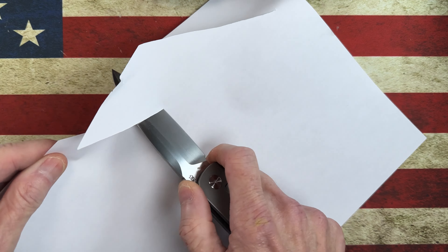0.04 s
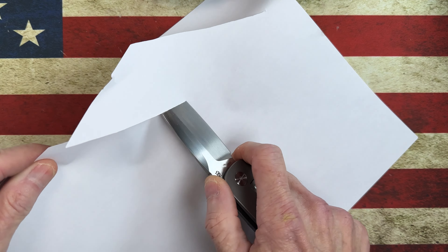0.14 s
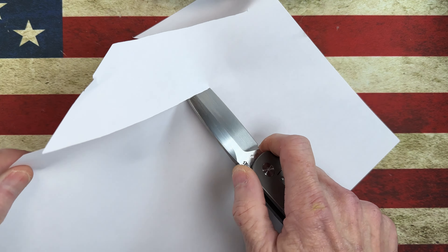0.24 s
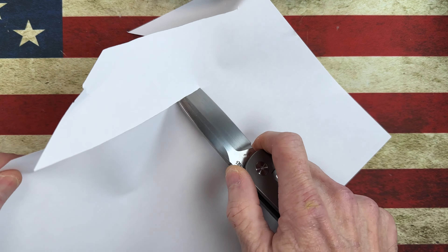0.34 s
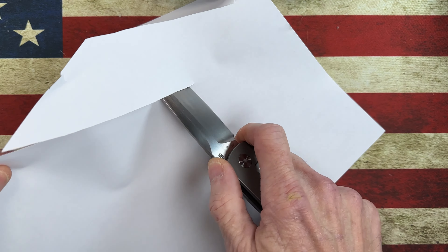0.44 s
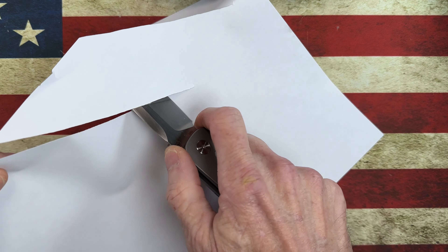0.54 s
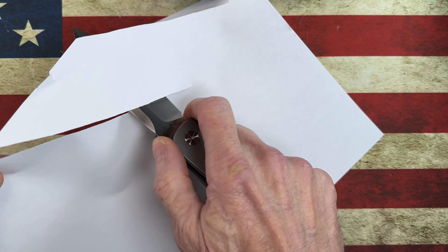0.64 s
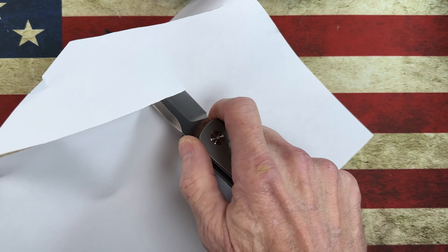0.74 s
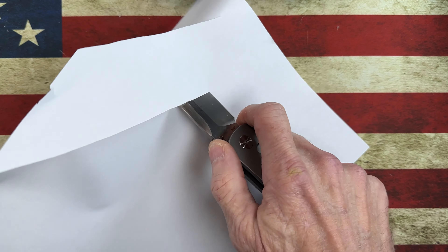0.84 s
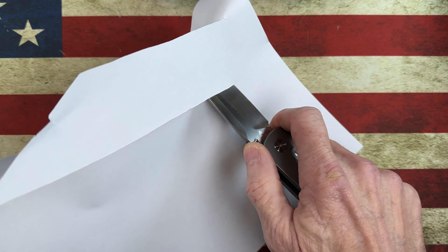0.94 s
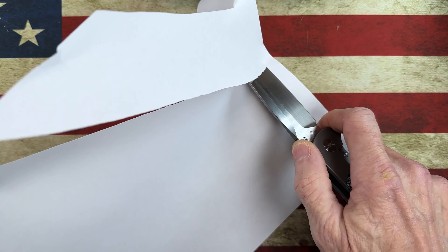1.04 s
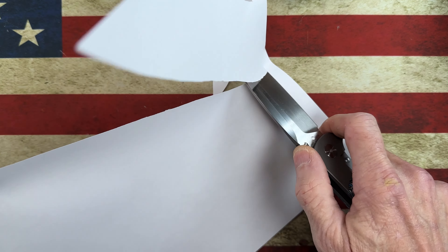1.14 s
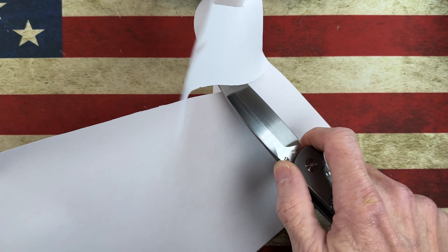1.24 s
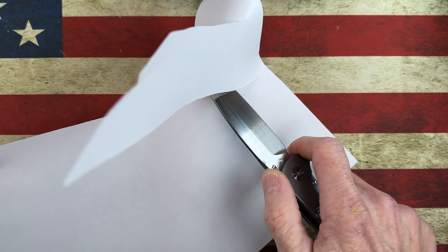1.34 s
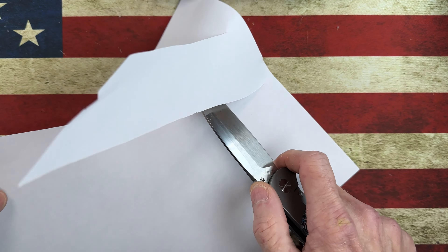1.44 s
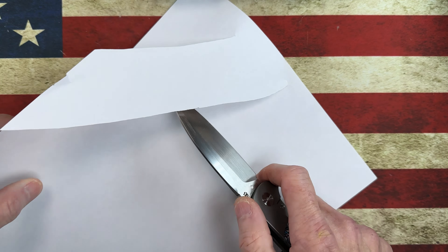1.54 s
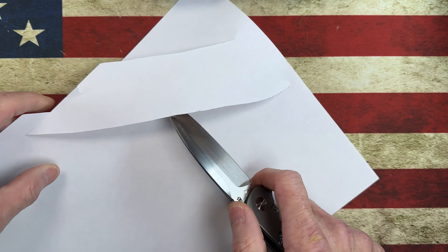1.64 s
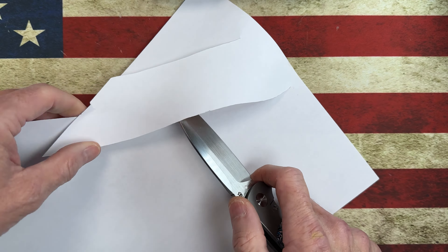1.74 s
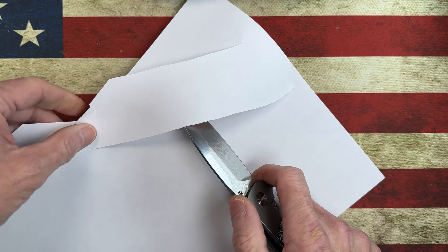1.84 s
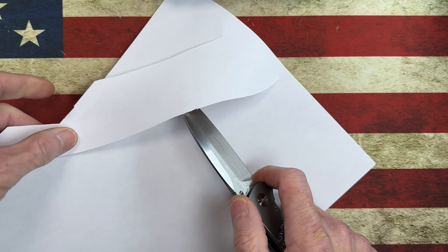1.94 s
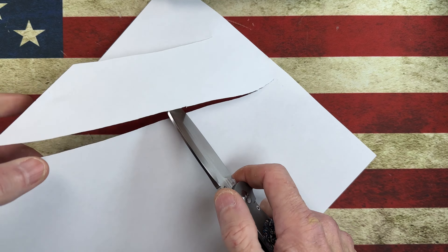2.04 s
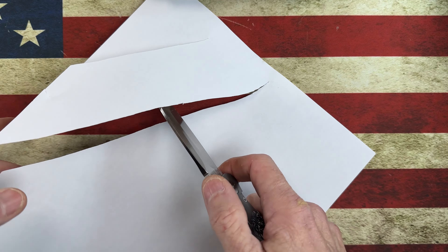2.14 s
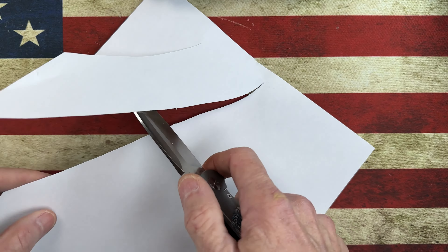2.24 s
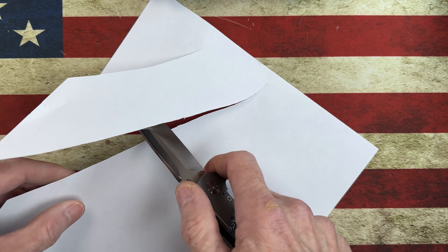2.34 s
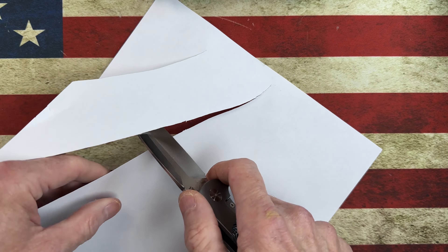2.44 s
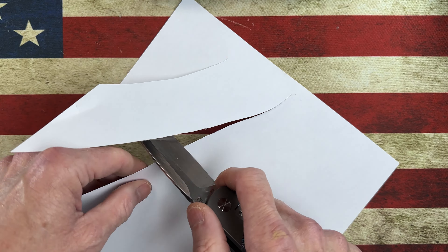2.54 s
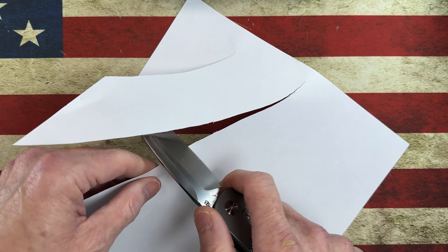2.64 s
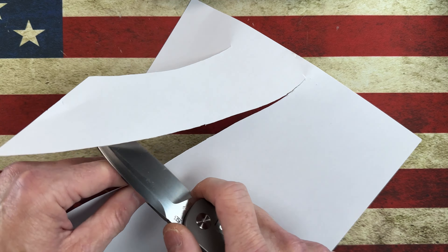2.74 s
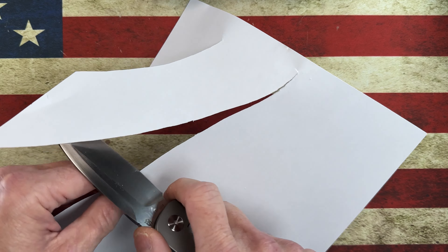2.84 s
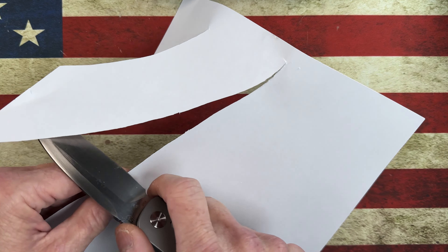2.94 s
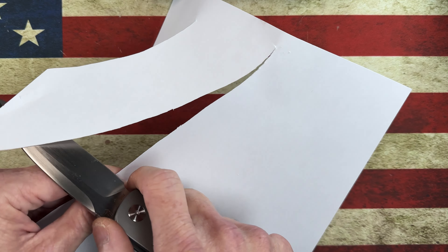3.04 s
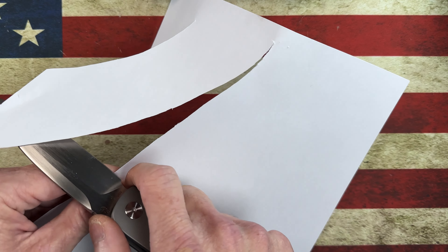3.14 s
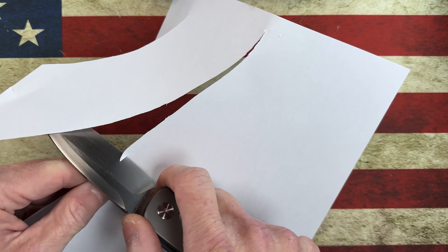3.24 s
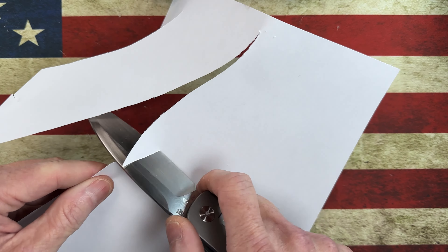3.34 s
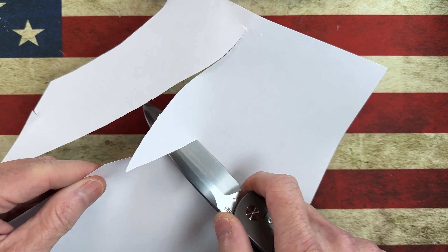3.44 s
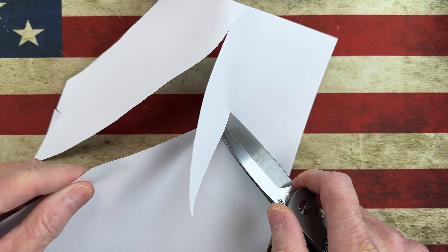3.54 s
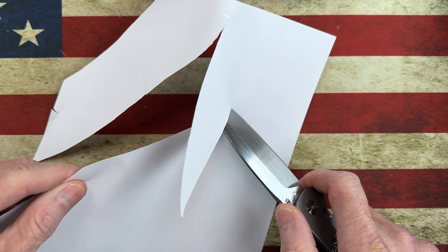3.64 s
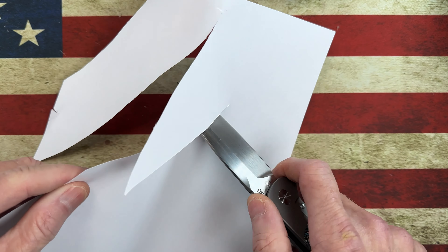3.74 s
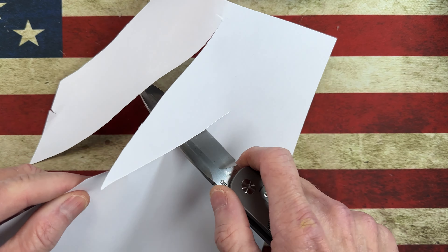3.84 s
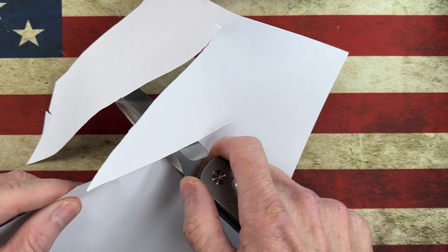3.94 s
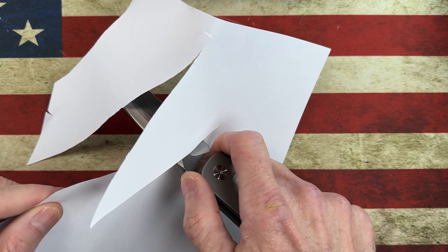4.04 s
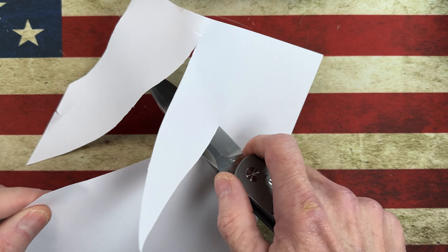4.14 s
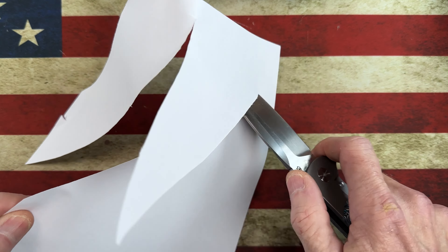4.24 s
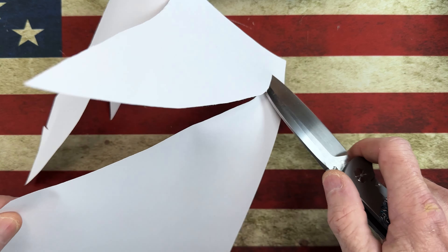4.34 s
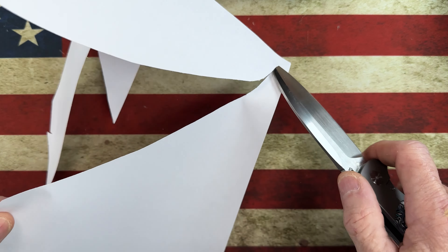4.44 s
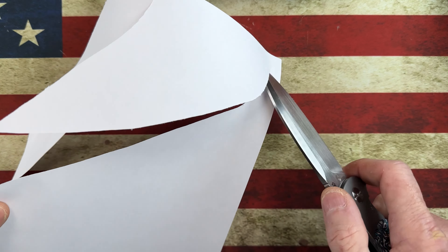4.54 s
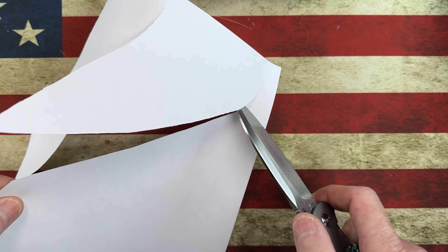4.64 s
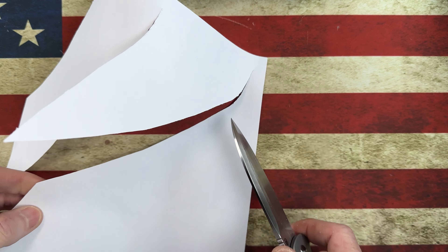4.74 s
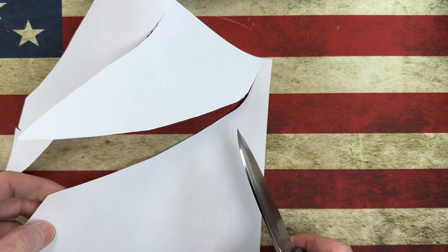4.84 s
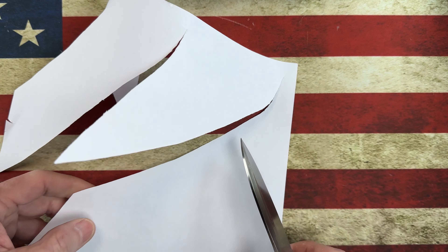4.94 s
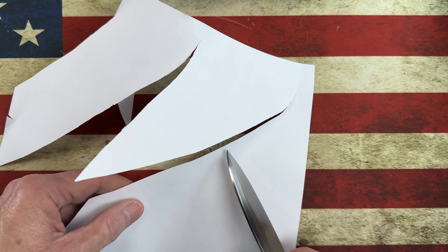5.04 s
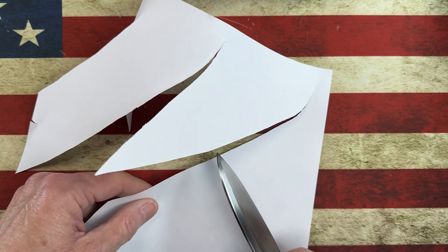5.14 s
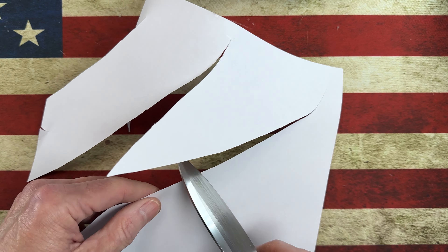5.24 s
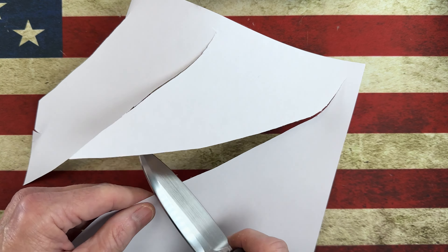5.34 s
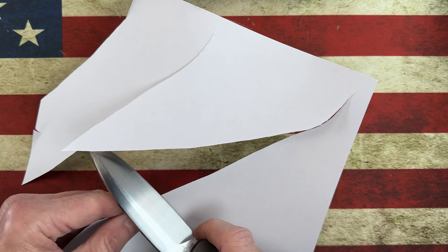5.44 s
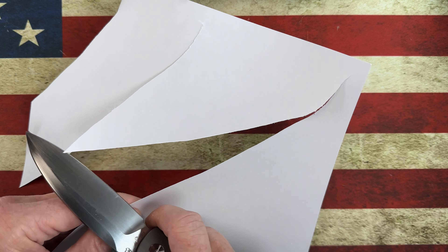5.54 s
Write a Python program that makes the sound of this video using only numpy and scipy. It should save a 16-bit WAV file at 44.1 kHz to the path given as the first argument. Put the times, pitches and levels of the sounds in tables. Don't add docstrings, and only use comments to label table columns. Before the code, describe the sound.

A close single microphone at a table in a small quiet room, with very low room air and faint hum. At 0 s a sharp blade is already slicing paper: a firm, loud, grainy crackling hiss with sharp fibre snaps, stopping by about 0.3 s. Faint rustle follows, with a soft flop near 0.75 s. From 0.8 to 1.15 s comes a lighter slice that fades out with a few snaps. From 1.2 to 2.6 s fingers make quiet crinkles, ticks and slips, most noticeable around 1.45 s. At 2.7 s the handle knocks the table once, a small hard tap with a brief paper rattle, then near silence. At 3.25 s a brighter slice builds, peaks about 3.5 s and lets go by 3.7 s. After slight rustling, an even, duller slice runs from 4.15 to 4.45 s. Until 5.6 s the lifted sheet softly flops, ticks and rustles.

```python
import sys
import numpy as np
from scipy import signal
from scipy.fft import rfft, irfft
from scipy.io import wavfile
from scipy.ndimage import uniform_filter1d

SR = 44100
rng = np.random.default_rng(int(sys.argv[2]) if len(sys.argv) > 2 else 0)


def int16_out(signal):
    q = np.round(np.clip(np.atleast_2d(signal).T, -1, 1) * 32767)
    wavfile.write(sys.argv[1], SR, q.astype(np.int16))


def voltage_ratio(decibels):
    exponent = np.asarray(decibels, float) / 20
    return 10 ** exponent


N = 246078

# pitch_hz, level_db (per Hz)
AIR_COLOUR = [(12, -35.5), (20, -1), (113, -7.5), (158, -3.5), (198, -4), (485, -13.5), (542, -21.5),
              (759, -14), (1060, -21), (3340, -39), (5230, -35), (13000, -42), (14800, -65)]
AIR_DB = -67.5
# pitch_hz, level_db, waver_hz
HUM_LINES = [(60.7, -69, 31), (89.2, -74.5, 8.5), (118, -69, 34), (203, -70, 19.3), (292, -76, 27)]

# time_s, force_db, bite_db (bite of the edge)
STROKES = [
    [(0, -37, -4), (0.03, -36.5, -4), (0.07, -33, -7.5), (0.12, -33, -9), (0.22, -37.5, -5),
     (0.282, -40, -4), (0.3, -54, -2), (0.325, -63, 2.5), (0.36, -67, 3)],
    [(0.799, -52, -10), (0.808, -45, -6.5), (0.85, -44, -3.5), (0.95, -42.5, -3.5), (1.0, -48, 2.5),
     (1.065, -47.5, 1), (1.085, -50.5, -8), (1.13, -53, -9), (1.18, -82, 7)],
    [(3.252, -60, -4), (3.27, -53, -1), (3.31, -46.5, -1.5), (3.36, -48.5, 3.5), (3.41, -40.5, -0.5),
     (3.52, -36.5, -5.5), (3.62, -44, -3.5), (3.66, -59.5, -10.5), (3.72, -66, -4)],
    [(4.148, -40, -8.5), (4.16, -42.5, -4), (4.21, -42.5, -2.5), (4.26, -42, -2.5), (4.31, -44, 0.5),
     (4.36, -47, 2.5), (4.4, -50, 3), (4.44, -58.5, 3), (4.5, -73.5, -4)],
]
# pitch_hz, level_db (per Hz)
SHEET_COLOURS = [
    [(88, -52), (150, -23), (871, -6.5), (1040, -10.5), (1870, -4), (3770, -10), (4580, -5.5), (7180, -12),
     (16000, -32)],
    [(88, -54.5), (150, -26), (197, -8), (383, -10), (716, -7), (1080, -6.5), (2220, -5.5), (9080, -11.5),
     (16000, -29.5)],
    [(88, -49), (150, 2), (264, -31), (484, -17), (1600, -3), (2020, -9.5), (2220, -6), (8230, -3),
     (16000, -17.5)],
    [(88, -53), (150, -4.5), (566, 4), (1940, 1), (2870, 1), (4160, -11.5), (7180, -16.5), (12200, -29),
     (16000, -40)],
]
# boom_at_start_db, boom_at_end_db, fizz_share_db
FLAP_SHARES = [(-17.5, -1.5, -4.5), (-6, -4, -3.5), (-9.5, -6, -5.5), (-1, -2, -1.5)]
BOOM_LAG, FIZZ_PER_BITE = 0.17, 1.33
# low_hz, high_hz
LAYERS = [(1170, 3600), (260, 1010), (3600, 7000), (7000, 17000)]
# centre_s, length_s, pitch_hz, level_db (over the
CUT_PANELS = [(0.11, 0.24, 4610, 9), (0.085, 0.18, 3270, 4), (0.13, 0.13, 7070, 11),
              (0.25, 0.11, 11030, 21), (0.21, 0.13, 5100, 10), (0.19, 0.16, 6680, 2),
              (0.17, 0.24, 1790, 3.5), (0.86, 0.079, 4620, 10), (0.82, 0.035, 9600, 6),
              (0.87, 0.088, 860, 10.5), (0.938, 0.12, 2000, 6.5), (1, 0.086, 8900, 10),
              (1.022, 0.03, 6700, 14), (3.3, 0.072, 11000, 6), (3.3, 0.068, 2920, 6),
              (3.335, 0.15, 4170, 11), (3.353, 0.1, 3170, 8), (3.388, 0.041, 7100, 8),
              (3.44, 0.11, 8400, 11), (3.44, 0.13, 1630, 7.5), (3.443, 0.042, 4360, 8),
              (3.526, 0.084, 7700, 10), (3.566, 0.069, 2160, 12), (3.568, 0.07, 6230, 16),
              (3.628, 0.055, 5100, 13), (4.158, 0.054, 1900, 6), (4.22, 0.16, 894, 13),
              (4.26, 0.13, 3300, 7), (4.261, 0.043, 2770, 9.5), (4.247, 0.19, 4600, 7.5),
              (4.39, 0.071, 970, 9), (3.5, 0.12, 500, 2.5), (3.45, 0.12, 970, 5.5), (4.35, 0.11, 5750, 6),
              (1.11, 0.05, 1830, 8), (0.29, 0.046, 1720, 7), (0.045, 0.036, 5100, 4),
              (0.079, 0.022, 2000, 0), (0.82, 0.043, 730, 6), (0.825, 0.04, 7100, -3),
              (3.408, 0.012, 3500, 5.5), (3.52, 0.026, 2900, 0.5), (3.51, 0.054, 1550, 3.5),
              (3.285, 0.059, 1520, 4), (3.35, 0.018, 890, 9), (3.29, 0.044, 830, 11), (0.82, 0.02, 1800, 1),
              (4.25, 0.22, 1350, -6), (4.2, .07, 7200, 6), (4.24, 0.13, 5300, 5)]
# centre_s, length_s, pitch_hz, level_db (over the
HELD_PANELS = [(0.49, 0.11, 1830, 4), (0.59, 0.073, 2000, 11), (0.744, 0.16, 2040, 9),
               (1.27, 0.088, 1760, 12), (1.448, 0.079, 9400, 4), (1.7, 0.09, 3100, 12),
               (2.188, 0.063, 2210, 12), (2.25, 0.37, 4480, 7), (2.46, 0.12, 7800, 10),
               (2.415, .04, 3100, 8), (1.435, 0.022, 4200, 8), (1.465, 0.011, 6100, 8),
               (3.832, 0.22, 7950, 9), (4.527, 0.064, 4000, 13), (4.625, 0.05, 5700, 10),
               (4.635, .05, 3000, 5), (4.632, 0.02, 6700, -1), (4.725, 0.046, 4100, 15),
               (5.5, 0.06, 4600, 7), (5.185, 0.083, 4280, 14), (5.18, 0.08, 7600, 6),
               (1.487, 0.07, 2000, 4), (1.7, 0.055, 4100, 8), (1.642, 0.039, 2500, 0),
               (1.724, 0.047, 2250, 8), (1.794, 0.042, 3200, 16), (1.865, 0.037, 4400, 3),
               (2.7, 0.016, 3170, 11), (2.4, 0.023, 1950, 11), (2.197, 0.026, 2600, 12),
               (2.1, 0.024, 2200, 3), (0.718, 0.046, 4600, 4), (0.723, 0.04, 7100, 4),
               (5.2, 0.022, 1500, 12), (3.86, 0.1, 6200, 8), (2.29, 0.036, 1250, 11),
               (2.645, 0.02, 4600, 5.5), (4.912, 0.12, 7500, 4), (5.1, 0.066, 2860, 9),
               (5.43, 0.059, 5650, 11)]
CUT_WIDTH_HZ, HELD_WIDTH_HZ, LOUDEST_PANEL_DB = 297, 560, 11
EVEN_BELOW_HZ = 4500
STROKE_ECHO = [0.041, 0.11, 0.023, 0.055]
RUSTLE_ECHO = [0.093, 0.2, 0.21, 0.086, 0.032]
TABLE_HZ = 2450

# start_s, peak_db, pitch_hz
SNAPS = [(0.0592, -20, 1870), (0.8056, -35.5, 3200), (1.0185, -30, 5000), (1.06, -35, 2330),
         (1.082, -31.5, 3050), (1.2657, -48, 1870), (1.274, -53, 5000), (1.313, -56, 4200),
         (1.397, -47, 1910), (1.475, -46, 3000), (1.526, -55, 2290), (1.6944, -54, 3000),
         (1.8598, -54, 4260), (1.936, -52, 2620), (2.0117, -48, 3270), (2.2516, -57, 4600),
         (1.4445, -42, 5500), (1.4647, -53, 4000), (2.1858, -53, 2490), (2.2819, -55, 3160),
         (2.4, -53, 3130), (2.6395, -46, 5000), (4.431, -38.5, 2840), (4.4652, -41, 2500),
         (4.6064, -58, 5790), (4.6265, -48, 5450), (4.7198, -51, 3900), (4.884, -53, 4970),
         (4.9113, -50, 4000), (5.0125, -47, 4170), (5.069, -47.5, 1100), (5.087, -46.5, 2840),
         (5.1462, -56, 4070), (5.1646, -53, 3300), (5.205, -50, 4380), (1.29, -50, 4500),
         (1.367, -57, 5000), (1.7872, -53, 3300), (1.949, -51, 3300), (2.049, -55, 3120), (2.16, -61, 2140),
         (3.22, -64, 800), (4.5747, -55, 4090), (4.869, -60, 5550), (5.064, -50.5, 2840),
         (5.1304, -58, 2790), (.713, -52, 2100), (.728, -52, 4600)]
SNAP_T60_S, SNAP_CRACK_DB = 0.016, -10.5
# start_s, peak_db, pitch_hz
TICKS = [(0.1015, -21, 2270), (0.231, -21, 1920), (0.4279, -63, 4560), (0.6985, -60, 2150),
         (0.806, -54, 1870), (1.259, -47.5, 2100), (1.288, -47, 1640), (1.365, -48, 1560),
         (1.4375, -47, 4340), (1.46, -38, 2400), (1.5, -45, 1960), (2.018, -57, 3300), (2.0483, -65, 3120),
         (2.253, -54, 915), (2.6372, -60, 4950), (3.255, -61, 2880), (4.01, -50, 3070), (4.148, -39, 880),
         (4.189, -31.5, 950), (4.4662, -43, 2130), (4.94, -63, 4970), (4.9923, -49, 4970),
         (5.4272, -49.5, 5370)]
TICK_T60_S = 0.034
CRACK_DB, CRACK_DB_PER_OCTAVE = -3.5, -3.5

# start_s, end_s
PAUSES = [
    (0.35, 0.785),
    (1.17, 2.3),
    (2.3, 3.225),
    (3.71, 4.11),
    (4.49, 5.58),
]
# pitch_hz, level_db (per Hz)
LOW_COLOUR = [(150, -32), (250, -24), (302, 18), (318, -17), (433, -8.5), (1320, -9), (2200, -9.5),
              (4440, -9.5), (9610, -24), (15500, -38)]
# pitch_hz, level_db (per Hz)
LIFTED_COLOUR = [(150, -22), (250, -6), (411, -0.5), (455, -8.5), (652, -2.5), (1670, -12.5), (5750, -9.5),
                 (9130, -13), (15000, -27)]
# time_s, rubbing_db, bite_db
FIDGET = [(0.35, -68.5, 2.5), (0.64, -68, 0.1), (0.672, -83, 2), (1.17, -69, -1), (1.243, -72, -2),
          (1.3, -68.5, 1.5), (1.56, -70, -2), (2.05, -80, 3), (2.12, -84, 2), (2.4, -74.5, 1),
          (2.72, -73, -0.5), (2.88, -85.5, -7), (3.21, -87.5, 3), (3.71, -67, -14), (4.11, -70.5, 3),
          (4.5, -68.5, -2), (4.78, -76.5, 2), (5.5, -82.5, -5.5)]
# peak_s, swell_s, fade_s, level_db, bite_db (swell and fade are times for 10 dB)
SLIPS = [(.44, 0.0089, 0.014, -58, 1.5), (0.71, 0.019, 0.054, -56, -5), (.73, .008, 0.018, -64.5, 5),
         (.8, 0.019, 0.011, -57, 2), (2.054, 0.0055, 0.0081, -66.5, 2), (2.975, .008, 0.0098, -74.5, 1.5),
         (3.09, .015, 0.015, -82, 2), (3.97, .01, .015, -68, 3), (4.068, 0.011, 0.0079, -72, 2),
         (1.266, 0.0084, 0.064, -62.5, -3.5), (1.445, 0.011, 0.012, -56.5, 3),
         (1.474, 0.042, 0.034, -55.5, -16), (1.86, .04, 0.084, -69, 2), (1.96, 0.038, 0.021, -65, -0.5),
         (2.018, 0.039, 0.013, -67.5, 1), (2.182, 0.021, 0.046, -65, -8), (2.254, .004, 0.039, -67, 0),
         (2.4, 0.021, 0.49, -73, 0.5), (2.598, 0.0091, 0.017, -69, 0), (2.65, 0.014, 0.03, -72, 3),
         (2.699, 0.002, 0.011, -62, -2), (4.016, 0.027, 0.046, -66, -14), (4.03, .008, .015, -74, 7),
         (4.632, 0.023, 0.022, -60.5, -0.5), (4.732, 0.031, 0.035, -67, -1),
         (4.945, .006, 0.022, -80.5, 17), (5.094, 0.066, 0.011, -76, -13), (1.291, .004, 0.011, -64, 5),
         (5.168, .005, .03, -70, 5), (5.19, 0.045, 0.056, -72, 6.5), (5.43, 0.0022, 0.04, -68.5, -2)]
# start_s, end_s, level_db, bite_db
SLIDES = [(1.617, 1.669, -64, -8.5), (1.698, 1.772, -67.5, -3), (1.78, 1.814, -68.5, -0.5),
          (1.927, 2.058, -83, -2), (2.6375, 2.643, -60, 1), (3.722, 3.944, -78, 9), (4.58, 4.62, -69, 0),
          (4.71, 4.74, -73, 5.5), (4.874, 5.095, -74, 4), (5.005, 5.093, -67, -16), (5.145, 5.276, -71, -6),
          (5.311, 5.398, -75, -0.5), (5.53, 5.6, -78, -2)]
# peak_s, swell_s, fade_s, level_db
FLOPS = [(0.381, 0.042, 0.23, -67), (.776, 0.035, 0.044, -54.5), (1.362, 0.088, .05, -68.5),
         (2.0, 0.015, 0.19, -67), (2.255, 0.0055, 0.024, -59.5), (2.285, 0.016, 0.022, -64),
         (2.71, .02, 0.013, -62), (3.221, 0.002, 0.092, -69), (3.9, 0.12, 0.045, -70),
         (4.06, 0.2, .11, -69), (4.65, 0.098, 0.064, -63.5), (5.08, 0.082, 0.05, -57),
         (5.27, 0.11, 0.037, -64.5), (5.57, 0.67, .05, -72.5)]
SLIP_BOOM_DB, SLIP_FIZZ_DB = -12, -7
FIDGET_BOOM_DB, FIDGET_BOOM_LAG = -77, 0.68
SLIDE_EDGE_S, LINGER_S = 0.0017, 0.035

# pitch_hz, level_db, t60_s
KNOCK_MODES = [(600, -58, .035), (885, -50, .046), (1150, -46, .025), (1680, -31.5, .0125),
               (2150, -46, .025), (2600, -44, .009), (3150, -43, .009)]
KNOCK_S, KNOCK_RISE_S = 2.6965, 0.0005
# start_s, peak_db, pitch_hz, treble_db, t60_s
KNOCK_TAILS = [
    (2.7, -49.5, 1400, -11, 0.1),
    (2.707, -52, 1100, -20, 0.06),
]

# pitch_hz, t60_s
ROOM_DECAY = [(300, 0.1), (1500, 0.42), (5000, 0.25), (12000, 0.18)]
ROOM_DB = -12.5
MIC_EDGE_HZ, MIC_OFFSET = 15900, -0.00032


def evened(x):
    return x / np.sqrt(np.mean(x ** 2) + 1e-20)


def read(points, hz):
    f, value = np.transpose(points)
    return np.interp(np.log(hz + 1), np.log(f + 1), value)


def add(mix, s, sound):
    part = mix[round(s * SR):][:len(sound)]
    part += sound[:len(part)]


def band(x, lo_hz, hi_hz):
    edges = [lo_hz, min(hi_hz, SR / 2.2)]
    return signal.sosfilt(signal.butter(2, edges, "band", fs=SR, output="sos"), x)


def resonate(x, hz, width_hz):
    pole = np.exp((-np.pi * width_hz + 2j * np.pi * hz) / SR)
    return 2 * signal.lfilter([1 - abs(pole)], [1, -pole], x).real


def background():
    hz = np.fft.rfftfreq(N, 1 / SR)
    air = irfft(rfft(rng.standard_normal(N)) * voltage_ratio(read(AIR_COLOUR, hz)), N)
    mix = voltage_ratio(AIR_DB) * evened(air)
    for line_hz, db, waver_hz in HUM_LINES:
        steady = np.sqrt(2) * np.sin(2 * np.pi * line_hz * np.arange(N) / SR)
        waver = resonate(rng.standard_normal(N), line_hz, waver_hz)
        waver = evened(resonate(waver, line_hz, waver_hz))
        mix = mix + voltage_ratio(db) * evened(1.55 * steady + waver)
    return mix


def stroke(curve, boom_from_db, boom_to_db, fizz_db):
    s, force_db, bite_db = np.transpose(curve)
    boom_db = np.interp(s, s[[0, -1]], [boom_from_db, boom_to_db])
    boom_db = boom_db + BOOM_LAG * (force_db.max() - force_db)
    return np.transpose([s, force_db, boom_db, bite_db, fizz_db + FIZZ_PER_BITE * bite_db])


def ringing(hz, t):
    field = np.zeros((len(hz), len(t)))
    panels = [(*row, CUT_WIDTH_HZ) for row in CUT_PANELS]
    panels += [(*row, HELD_WIDTH_HZ) for row in HELD_PANELS]
    for s, length, centre_hz, db, width_hz in panels:
        phase = np.clip((t - s) / (1.2 * length), -.5, .5)
        while_bent = np.cos(np.pi * phase).clip(0) ** .25
        resonance = np.exp(-.5 * ((hz[:, None] - centre_hz) / (0.54 * width_hz)) ** 2)
        field += min(db, LOUDEST_PANEL_DB) * resonance * while_bent
    return field


def layered(snaps, start, colour, table_share, streak_db):
    hz, t, z = signal.stft(snaps, SR, nperseg=512, noverlap=384)
    streaks = uniform_filter1d(rng.standard_normal(z.shape), size=9, axis=1)
    streaks = evened(uniform_filter1d(streaks, size=3, axis=0))
    rings_db = ringing(hz, start + t)
    streaks = streaks * np.clip(1 - rings_db / LOUDEST_PANEL_DB, 0, 1)
    streaks_db = streak_db * streaks * np.clip(hz / EVEN_BELOW_HZ, .6, 1.3)[:, None]
    gain = voltage_ratio(read(colour, hz)[:, None] + rings_db + streaks_db)
    echo = table_share * np.exp(-2j * np.pi * hz / TABLE_HZ)
    gain = gain * abs(1 + echo)[:, None]
    for lo_hz, hi_hz in LAYERS:
        rolloff = (1 + (lo_hz / (hz[:, None] + 1)) ** 12) * (1 + (hz[:, None] / hi_hz) ** 12)
        part = gain / rolloff
        part = part / np.sqrt(np.mean(part ** 2, axis=0))
        yield evened(signal.istft(z * part, SR, nperseg=512, noverlap=384)[1][:len(snaps)])


def paper(rows, colour, table_share, linger_s, snaps_per_s, spread_db, clump_db, streak_db):
    s, *columns = np.transpose(rows)
    t = np.arange(s[0], s[-1] + linger_s, 1 / SR)
    force_db, *shares_db = (np.interp(t, s, c) for c in columns)
    draw = rng.random((len(t), 3))
    size_db = spread_db * np.minimum(-np.log(1 - draw[:, 0]), 4.5)
    size = voltage_ratio(size_db) * np.sign(draw[:, 1] - .5)
    slips = voltage_ratio(3.0 * rng.exponential(1, len(t))) * (rng.random(len(t)) < 450 / SR)
    clumps = evened(signal.lfilter([1], [1, -np.exp(-1 / (.002 * SR))], slips))
    happens = draw[:, 2] < snaps_per_s / SR
    snaps = size * happens * voltage_ratio(clump_db * np.minimum(clumps, 2.2))
    body, *others = layered(snaps, s[0], colour, table_share, streak_db)
    sheet = body + sum(voltage_ratio(db) * layer for db, layer in zip(shares_db, others))
    ends = signal.windows.tukey(len(t), 0.00064 / (t[-1] - t[0]))
    return s[0], voltage_ratio(force_db) * sheet * ends


def tick(s, db, hz, treble_db, t60_s):
    t = np.arange(4000) / SR
    puff = (5.4 * (t == 0) + rng.standard_normal(len(t))) * voltage_ratio(-60 * t / max(t60_s, .005))
    ring = band(puff, 0.67 * hz, 1.42 * hz)
    crack = band(puff, 3000, 6600)
    return s, voltage_ratio(db) * (ring / abs(ring).max() + voltage_ratio(treble_db) * crack / abs(crack).max())


def hump(t, peak, swell, fade, db):
    return db - 10 * np.where(t < peak, (peak - t) / max(swell, .002), (t - peak) / max(fade, .002))


def plateau(t, start, end, db):
    outside_s = np.maximum(np.maximum(start - t, t - end), 0)
    return db - 10 * outside_s / SLIDE_EDGE_S


def summed_db(levels_db):
    return 10 * np.log10(np.sum(voltage_ratio(np.maximum(levels_db, -140)) ** 2, axis=0))


def rustle(start, end):
    t = np.arange(start, end, .002)
    s, level_db, bite_db = np.transpose(FIDGET)
    rubs = [np.interp(t, s, level_db)]
    rubs += [hump(t, *row[:4]) for row in SLIPS]
    rubs += [plateau(t, *row[:3]) for row in SLIDES]
    rubs = np.array(rubs)
    bites = [np.interp(t, s, bite_db)]
    bites += [np.full(len(t), row[-1]) for row in [*SLIPS, *SLIDES]]
    bites = np.array(bites)
    steady_boom = FIDGET_BOOM_DB + (1 - FIDGET_BOOM_LAG) * (rubs[0] - FIDGET_BOOM_DB)
    flops = [hump(t, *row) for row in FLOPS]
    boom = summed_db([steady_boom, *(rubs[1:] + SLIP_BOOM_DB), *flops])
    force = summed_db(rubs)
    rasp = summed_db(rubs + bites)
    fizz = summed_db(rubs + SLIP_FIZZ_DB + FIZZ_PER_BITE * bites)
    return np.transpose([t, force, boom - force, rasp - force, fizz - force])


def knock():
    t = np.arange(4000) / SR
    modes = sum(voltage_ratio(db - 60 * t / t60_s) * np.sin(2 * np.pi * hz * t) for hz, db, t60_s in KNOCK_MODES)
    return KNOCK_S, modes * (1 - np.exp(-t / KNOCK_RISE_S))


def room(x):
    taps = np.zeros(SR // 2)
    at = np.arange(300, SR // 2 - 20, 20)
    taps[at + rng.integers(0, 20, len(at))] = rng.choice([-1., 1.], len(at))
    hz, t, z = signal.stft(taps, SR, nperseg=256)
    decay = voltage_ratio(-60 * t / read(ROOM_DECAY, hz)[:, None])
    tail = signal.istft(z * decay, SR, nperseg=256)[1]
    return signal.fftconvolve(x, tail / np.linalg.norm(tail))[:N]


def scene():
    near = np.zeros(N)
    for curve, flap, colour, share in zip(STROKES, FLAP_SHARES, SHEET_COLOURS, STROKE_ECHO):
        add(near, *paper(stroke(curve, *flap), colour, share, 0,
                         snaps_per_s=19000, spread_db=2.45, clump_db=1.1, streak_db=2.8))
    for row in SNAPS:
        add(near, *tick(*row, SNAP_CRACK_DB, SNAP_T60_S))
    for s, db, hz in TICKS:
        crack_db = CRACK_DB + CRACK_DB_PER_OCTAVE * np.log2(hz / 1000)
        add(near, *tick(s, db, hz, crack_db, TICK_T60_S))
    colours = [LOW_COLOUR] * 3 + [LIFTED_COLOUR] * 2
    for pause, colour, share in zip(PAUSES, colours, RUSTLE_ECHO):
        add(near, *paper(rustle(*pause), colour, share, LINGER_S,
                         snaps_per_s=13000, spread_db=2.9, clump_db=2.2, streak_db=3.1))
    add(near, *knock())
    for row in KNOCK_TAILS:
        add(near, *tick(*row))
    return np.tile(near + voltage_ratio(ROOM_DB) * room(near) + background(), (2, 1))


def top_cut(x):
    return signal.sosfilt(signal.butter(12, 15750, fs=SR, output="sos"), x)


def record(dry):
    low_pass = signal.firwin(255, MIC_EDGE_HZ, window=("kaiser", 9), fs=SR)
    limited = signal.oaconvolve(dry, low_pass[None], "same")
    return top_cut(limited + MIC_OFFSET)


dry = scene()
out = record(dry)
int16_out(out)
```